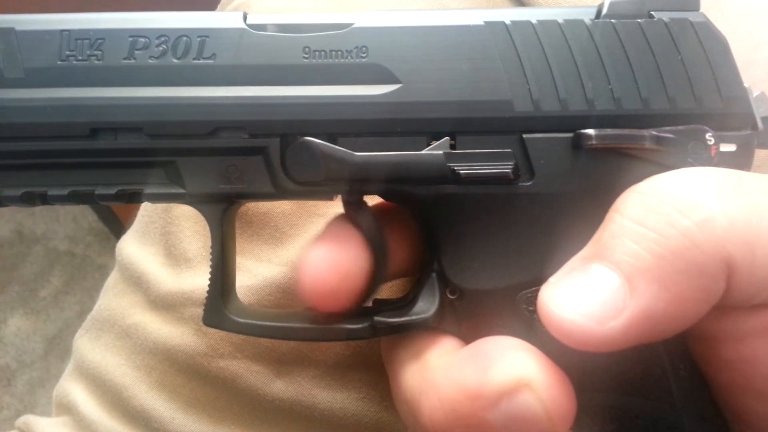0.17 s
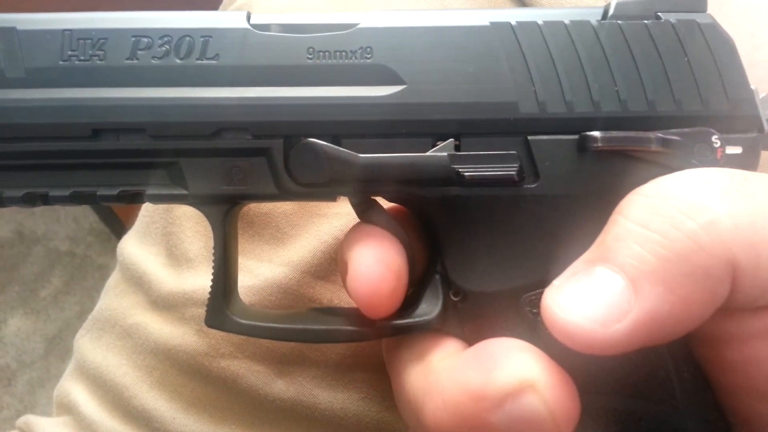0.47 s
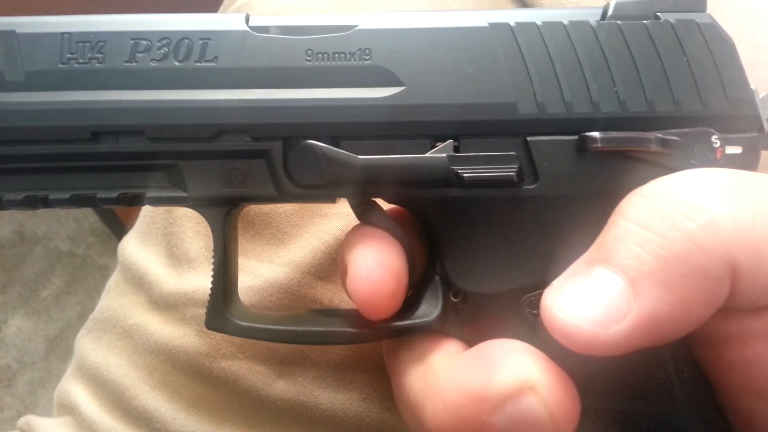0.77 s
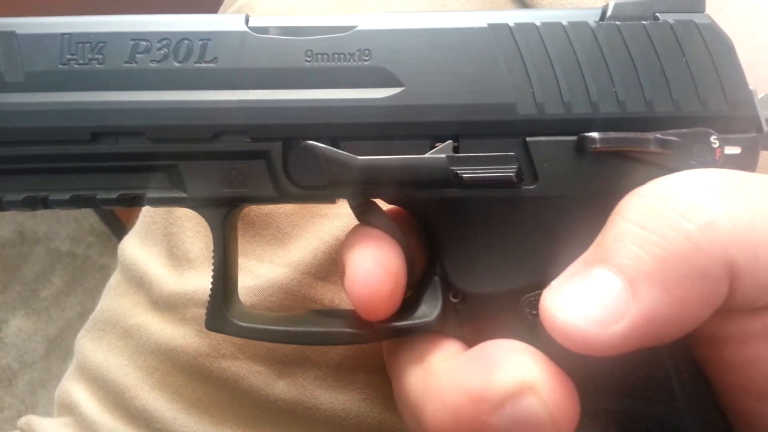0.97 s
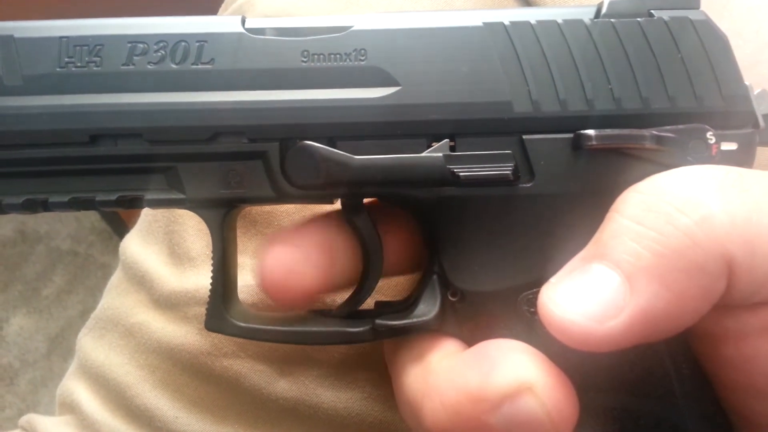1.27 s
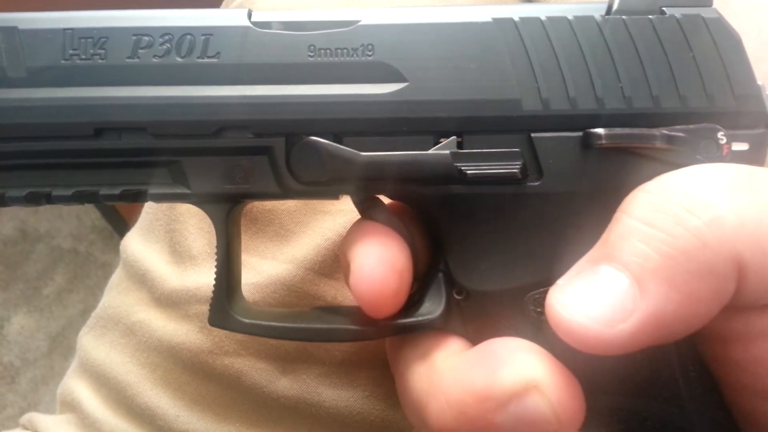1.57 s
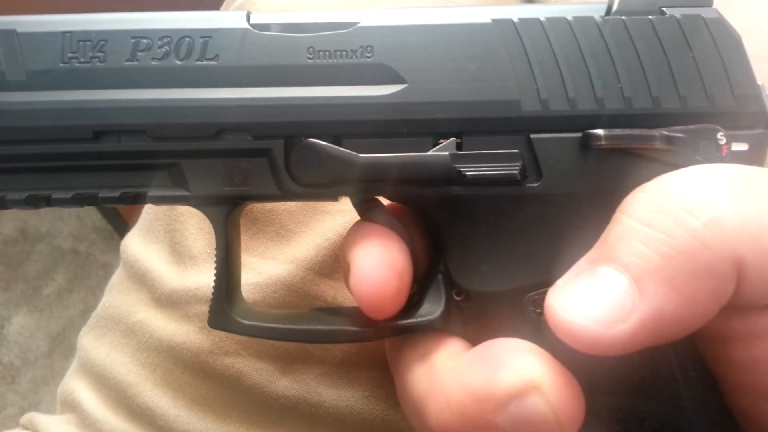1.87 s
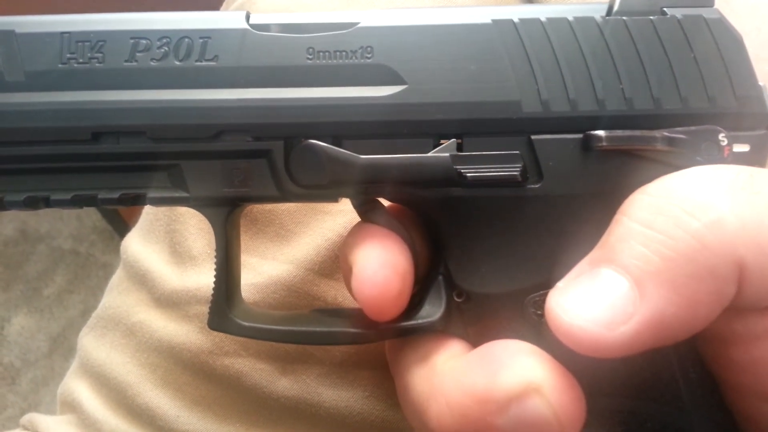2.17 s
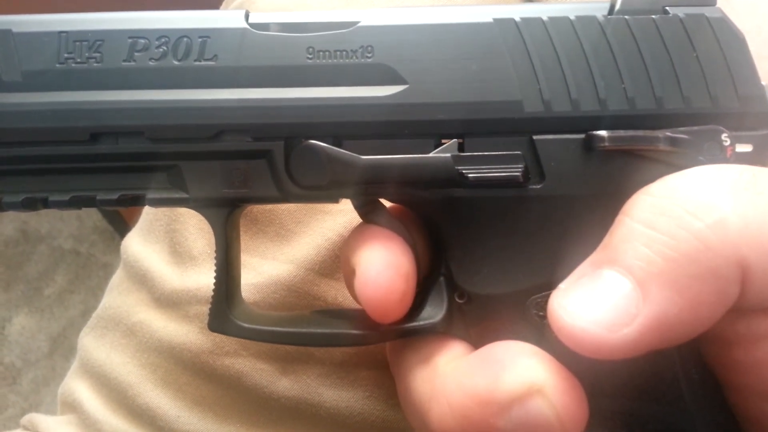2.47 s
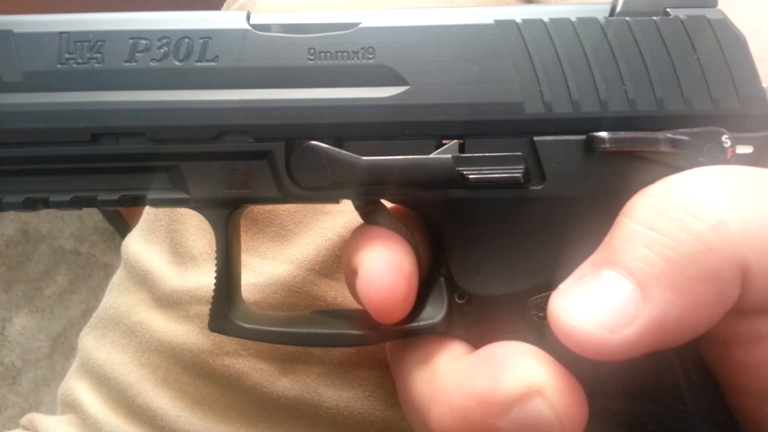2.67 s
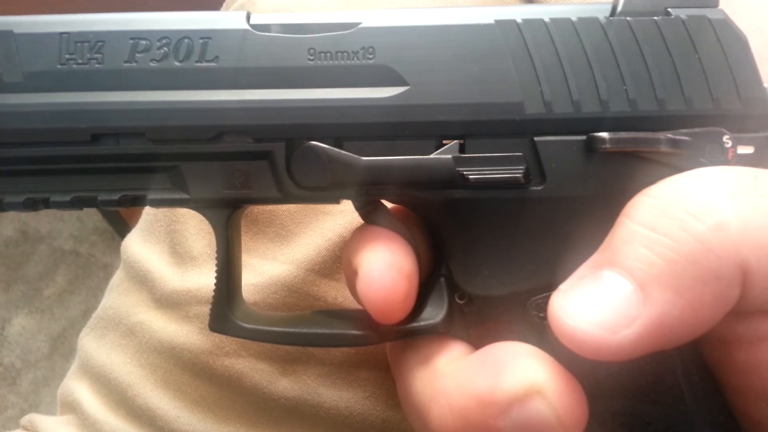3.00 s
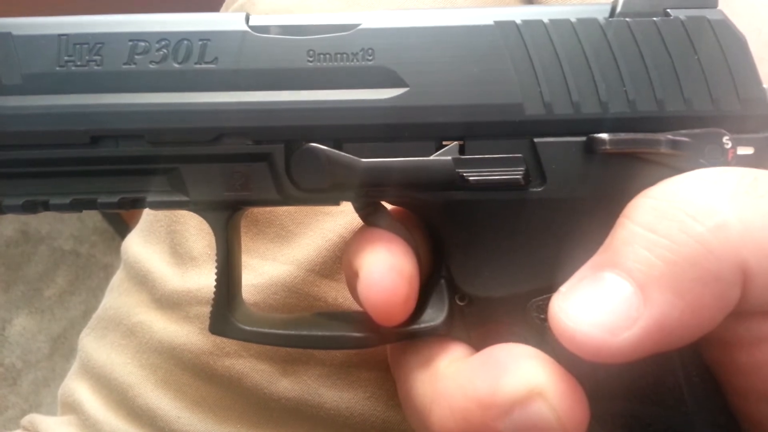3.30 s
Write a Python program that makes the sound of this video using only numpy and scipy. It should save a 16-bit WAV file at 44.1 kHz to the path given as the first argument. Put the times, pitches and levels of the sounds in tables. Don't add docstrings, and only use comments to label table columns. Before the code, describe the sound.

A pistol trigger is pulled, released with a knock and sharp reset click, then pulled again. Close stereo microphone, stronger on the right, indoors near a wall, over constant appliance hum, fan air and hiss.

```python
import sys
import numpy as np
from scipy import signal
from scipy.fft import rfft, irfft, next_fast_len
from scipy.io import wavfile
from scipy.ndimage import uniform_filter1d, map_coordinates

SR = 44100
rng = np.random.default_rng(int(sys.argv[2]) if len(sys.argv) > 2 else 0)


def boost_factor(decibels):
    exponent = np.asarray(decibels, float) / 20
    return 10 ** exponent


def to_wav(s):
    ch = np.atleast_2d(s).T
    pcm = np.round(np.clip(ch, -1, 1) * 32767)
    wavfile.write(sys.argv[1], SR, pcm.astype(np.int16))


N = 151704


def unit(x):
    return x / np.sqrt(np.mean(x ** 2) + 1e-20)


def along(points, hz):
    f, value = np.transpose(points)
    return np.interp(np.log(hz + 1), np.log(f + 1), value)


def wobble(rate):
    knots = rng.standard_normal(100)
    return map_coordinates(knots, [np.arange(N) * min(rate, 25) / SR])


def filtered(x, response):
    n = x.shape[-1]
    m = next_fast_len(n + 8192)
    return irfft(rfft(x, m) * response(np.fft.rfftfreq(m, 1 / SR)), m)[..., :n]


def rush(gain, alike, patchy_db):
    z = signal.stft(rng.standard_normal((2, N)), nperseg=512)[2]
    patches = uniform_filter1d(rng.standard_normal(z.shape[1:]), size=6, axis=0)
    patches = unit(uniform_filter1d(patches, size=14, axis=1))
    pair = signal.istft(z * boost_factor(patchy_db * patches), nperseg=512)[1][:, :N]

    def mid_side_gain(hz):
        turn = np.arccos(np.clip(along(alike, hz), -1, 1)) / 2
        return gain(hz) * [np.cos(turn), np.sin(turn)]

    mid, side = filtered(pair, mid_side_gain)
    return unit(np.array([mid + side, mid - side]))


MAINS_HZ = 60
# multiple of the mains, level/dB rms
HUM = [(1, -74.5), (2, -71), (3, -64), (4, -64.5), (5, -53), (6, -49), (7, -52.5), (9, -68), (10, -71),
       (11, -70), (14, -70.5), (18, -76.5)]
# f/Hz, level/dB rms
WHINE = [(75, -80.5), (195.5, -60.5), (974.5, -72.5), (1135, -71), (1216, -71.5), (1443, -76),
         (2400, -72.5)]


def appliance():
    out, t = np.zeros((2, N)), np.arange(N) / SR
    lines = [(k * MAINS_HZ, db, 0.2) for k, db in HUM]
    lines += [(hz, db, 0.38) for hz, db in WHINE]
    for hz, db, drift_rad in lines:
        twist = 1.0 * (hz / MAINS_HZ) ** 2
        phase = 2 * np.pi * hz * t + twist + drift_rad * wobble(8.11)
        side = boost_factor(-13.5) * (hz / 360) * np.cos(phase + 2 * np.pi * rng.random())
        level = boost_factor(db + 2 * wobble(9)) * np.sqrt(2)
        out += level * (np.sin(phase) + side * [[1], [-1]])
    return out


# f/Hz, level/dB per Hz
AIR = [(25, -26.5), (60, -14), (200, -2.5), (500, -4), (1000, -11.5), (2800, -13.5), (4500, -22.5),
       (6500, -38)]
# f/Hz, likeness [-1 to 1]
ALIKE = [(60, 0.52), (180, 0.71), (550, 0.52), (1650, -0.25), (4970, 0.25), (15000, -0.54)]
# f/Hz, left minus right level/dB
AIR_PAN = [(300, 1.5), (1300, -1.5), (4400, -1), (12000, -2)]


def fan_air():
    flow = rush(lambda hz: boost_factor(along(AIR, hz)), ALIKE, patchy_db=0.7)
    flow = boost_factor(-50.5 + 0.4 * wobble(3.1)) * flow
    return filtered(flow, lambda hz: boost_factor(along(AIR_PAN, hz) / 2 * [[1], [-1]]))


# f/Hz, width/Hz, level/dB
CASING = [(379.4, 27, 1), (239, 39, -10.5), (451.5, 48, -8), (296, 114, -7.5)]


def casing_drone():
    def resonance(hz):
        return abs(sum(boost_factor(db) * (hz * width / (centre * centre - hz * hz + 1j * hz * width)) ** 2
                       for centre, width, db in CASING))

    return boost_factor(-50 + 1.2 * wobble(5.08)) * rush(resonance, [(300, 0.95)], patchy_db=0.0)


# f/Hz, level/dB per Hz
HISS = [(1000, -36), (5000, 1.5), (6200, -0.5), (8000, 2), (12000, 3), (14500, 1)]


def hiss():
    return boost_factor(-60.5) * rush(lambda hz: boost_factor(along(HISS, hz)), [(1000, 0.0048)], patchy_db=0.1)


def contact(modes, bright_db):
    hz, right_db, left_db, swell_s = np.transpose(modes)[:, :, None]
    start = 2 * np.pi * rng.random(hz.shape)
    sound = []
    for late_s, lag_rad, port_db in [(0.0001, 0.6, left_db), (0, 0, right_db)]:
        t = np.maximum(np.arange(1024) / SR - late_s, 0)
        u = t / np.maximum(swell_s, 1e-4)
        grip = boost_factor(-6 * np.clip((t - 0.0026) / 0.0008, 0, 2))
        swing = (u * np.exp(1 - u)) ** 1.2 * grip
        after = boost_factor(-12 - 8 * np.log2(hz / 2000) - 60 * t / 0.02) * np.minimum(u, 1)
        wave = np.sin(2 * np.pi * hz * (t + late_s) + start - lag_rad)
        level = boost_factor(port_db + bright_db * np.log2(hz / 2500)) / np.sqrt(swell_s)
        sound.append((level * (swing + after) * wave).sum(0))
    return np.array(sound) / np.abs(sound).max()


# f/Hz, level/dB
WALL_COLOUR = [(500, -20), (1500, -8), (3500, 0), (4700, -3), (5500, -14), (9000, -20)]


def walls(sound):
    wall_s, spread_s, room_t60 = 0.0112, 0.002, 0.08
    t = np.arange(SR // 4) / SR
    wall = np.exp(-((t - wall_s) / spread_s) ** 2)
    tail = boost_factor(-60 * t / room_t60) * np.clip(t / wall_s, 0, 1)
    shape = boost_factor(-24) * wall / np.linalg.norm(wall) + boost_factor(-15.5) * tail / np.linalg.norm(tail)
    scatter = shape * rng.standard_normal((2, len(t)))
    answer = filtered(scatter, lambda hz: boost_factor(along(WALL_COLOUR, hz)))
    return signal.fftconvolve(sound[1:], answer * boost_factor([[-3], [0]]), axes=1)


def add(out, s, part):
    out[:, round(s * SR):][:, :part.shape[1]] += part


def strike(events, modes):
    out = np.zeros((2, N + SR))
    for s, peak_db, bright_db in events:
        level_db = peak_db + 3
        sound = boost_factor(level_db) * contact(modes, bright_db)
        bounce = boost_factor(level_db - 13) * contact(modes, bright_db - 4)
        add(out, s, sound)
        add(out, s + 0.0032, bounce)
        add(out, s, walls(sound))
    return out[:, :N]


# t/s, peak level/dB, brightness/dB per octave
TAKEUPS = [
    (0.2567, -27.5, 3),
    (1.48, -22, 5.5),
]
# f/Hz, right level/dB, left level/dB, time to full swing t/s
BAR = [(884, 4.5, -0.5, 0.00066), (1970, 2.5, -16, 0.0011), (2640, 1.5, -6, 0.0007),
       (3400, -0.5, -21, 0.0012), (4350, 1.5, -17, 0.00074), (5600, -25, -34, 0.00067),
       (6400, -21, -38, 0.0007)]


def take_up():
    return strike(TAKEUPS, BAR)


# t/s, peak level/dB, brightness/dB per octave
TICKS = [
    (.2882, -40, -1),
    (1.5025, -37, -1),
]
# f/Hz, right level/dB, left level/dB, time to full swing t/s
SPRING = [(1100, 0, -5, .0014), (2000, -5, -14, .0012), (2600, -5, -9, .0014), (3400, -11, -13, .001),
          (4480, -12, -21, .0012)]


def spring_tick():
    return strike(TICKS, SPRING)


# t/s, peak level/dB, brightness/dB per octave
STOPS = [
    (.3137, -15.5, 0),
    (1.5242, -15.5, 0),
]
# f/Hz, right level/dB, left level/dB, time to full swing t/s
FRAME = [(790, -12.5, -16, 0.0025), (1030, -9.5, -15.5, 0.001), (1894, -1, -11.5, 0.00055),
         (2840, 3, -4.5, 0.0012), (3340, -15, -11.5, 0.00094), (3880, -0.5, -13, 0.00045),
         (4440, -6.5, -33, 0.00075), (5640, -17, -42, 0.00045), (6570, -11.5, -39, 0.00048),
         (8100, -18.5, -34, 0.00042), (8700, -11.5, -23, 0.00026), (10620, -18.5, -38, 0.00019),
         (12600, -33, -44, .0003), (14200, -37, -42, 0.00018)]


def frame_stop():
    return strike(STOPS, FRAME)


# t/s, peak level/dB, brightness/dB per octave
RETURNS = [
    (1.0557, -27.5, 0),
]
# f/Hz, right level/dB, left level/dB, time to full swing t/s
LEVER = [(1090, -5, -9, 0.0016), (2200, -0.5, -18, .0015), (3040, 2.5, -7, 0.003), (3900, -5, -9, 0.00062),
         (4450, -4.5, -15, 0.00093), (6300, -18, -38, 0.0011)]


def lever_return():
    return strike(RETURNS, LEVER)


# t/s, peak level/dB, brightness/dB per octave
RESETS = [
    (1.0967, -15, 0),
]
# f/Hz, right level/dB, left level/dB, time to full swing t/s
SEAR = [(860, -14.5, -19.5, 0.00095), (1820, -1, -15, 0.001), (2730, -6, -6, 0.0017),
        (2970, 2, -12, 0.00083), (3620, -4.5, -6.5, 0.00048), (4270, -16, -7, 0.0002),
        (4470, -4, -34, 0.0005), (6580, -10.5, -33, 0.00053), (8200, -21, -24, 0.0003),
        (10300, -18, -36, 0.00033), (11500, -23, -36, 0.0004), (12800, -32, -36, .0003),
        (14400, -33, -36, .0002)]


def sear_reset():
    return strike(RESETS, SEAR)


def scene():
    background = appliance() + fan_air() + casing_drone() + hiss()
    trigger = take_up() + spring_tick() + frame_stop() + lever_return() + sear_reset()
    return background + trigger


def band_limit(x):
    return signal.sosfilt(signal.butter(12, 15580, fs=SR, output="sos"), x)


def record(dry):
    def band(hz):
        return boost_factor(-40 * (hz > 14600)) * hz / (hz - 1j * 30)

    mix = filtered(dry, band)
    return band_limit(mix)


dry = scene()
out = record(dry)
to_wav(out)
```